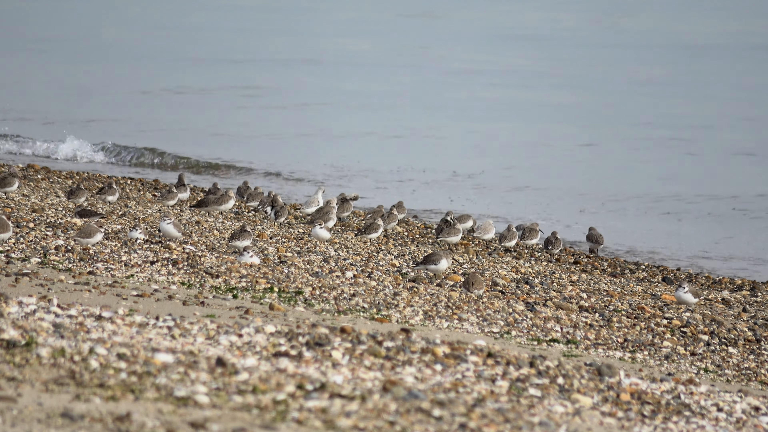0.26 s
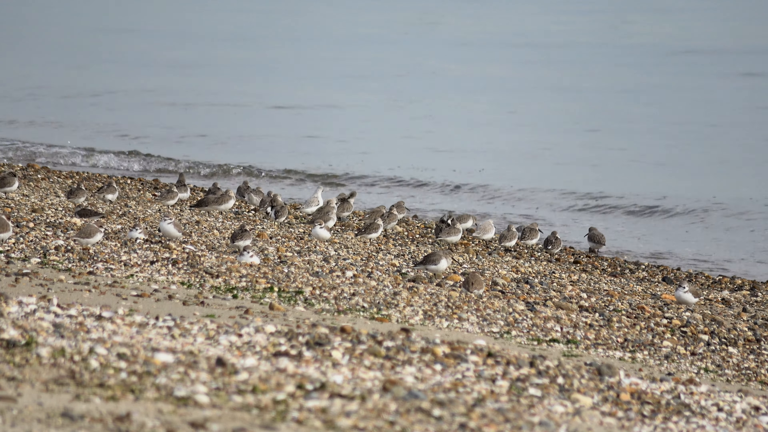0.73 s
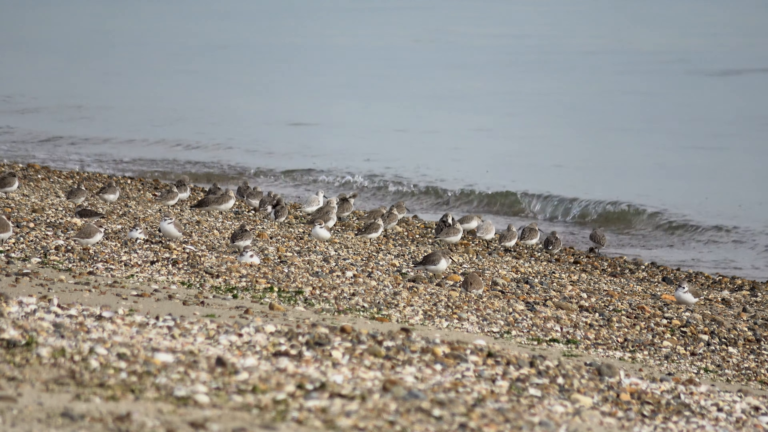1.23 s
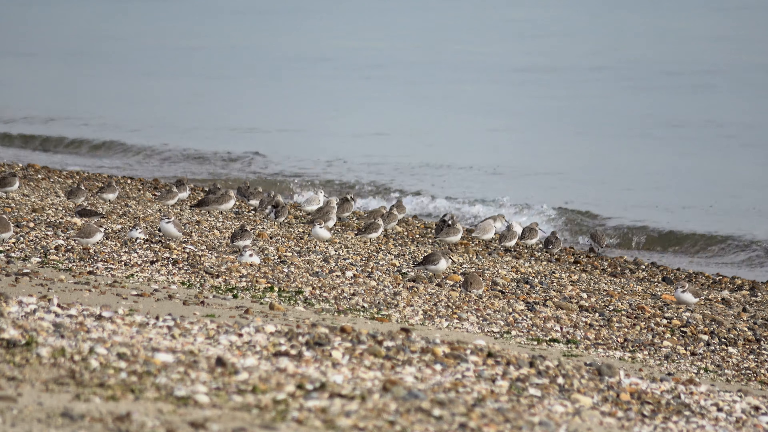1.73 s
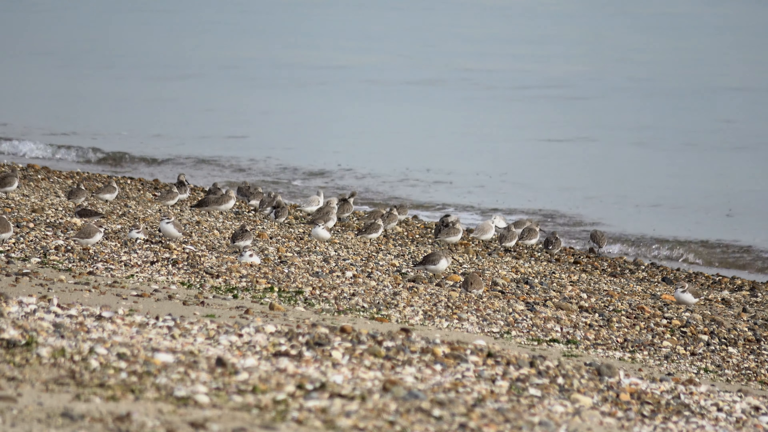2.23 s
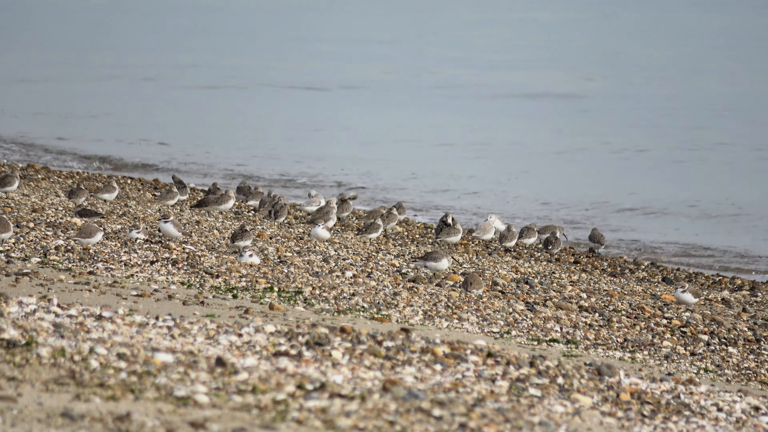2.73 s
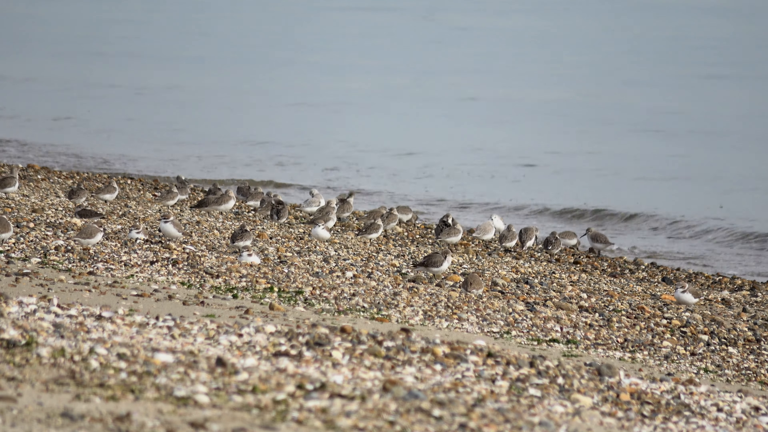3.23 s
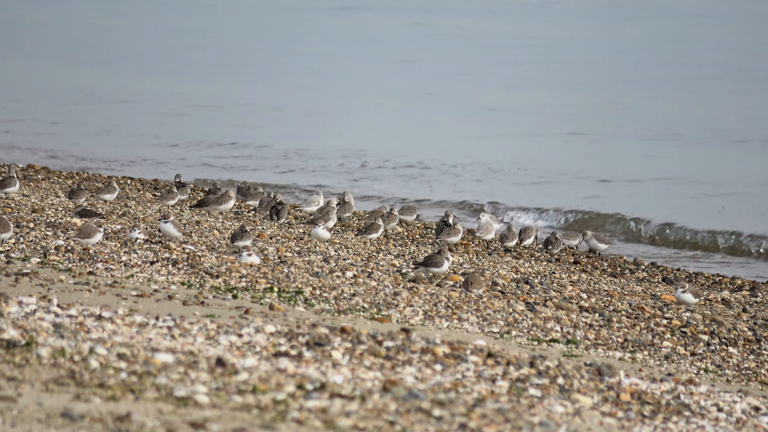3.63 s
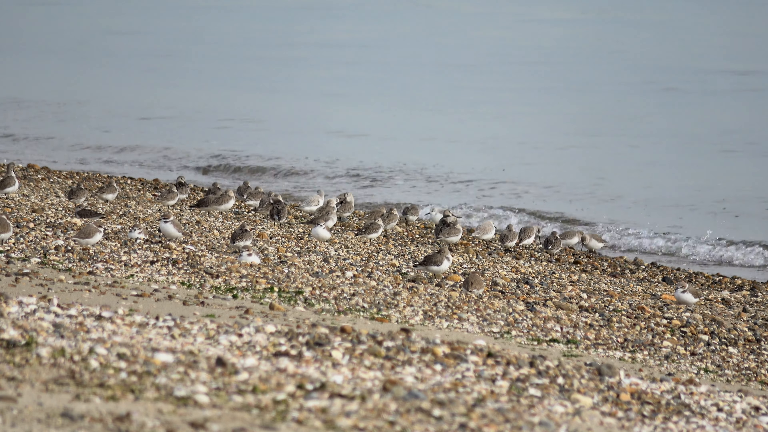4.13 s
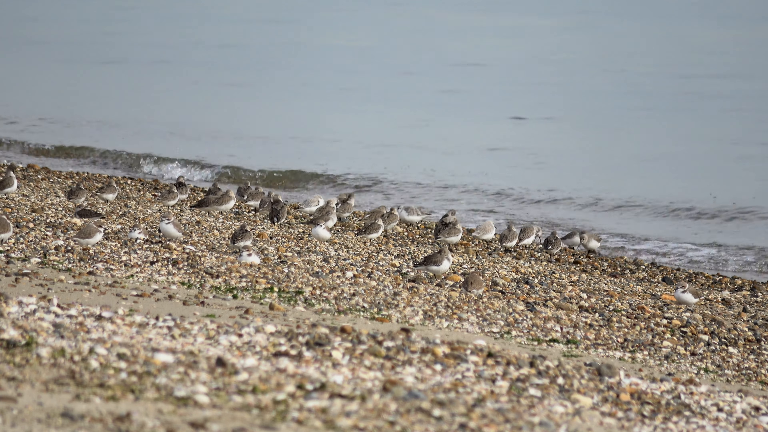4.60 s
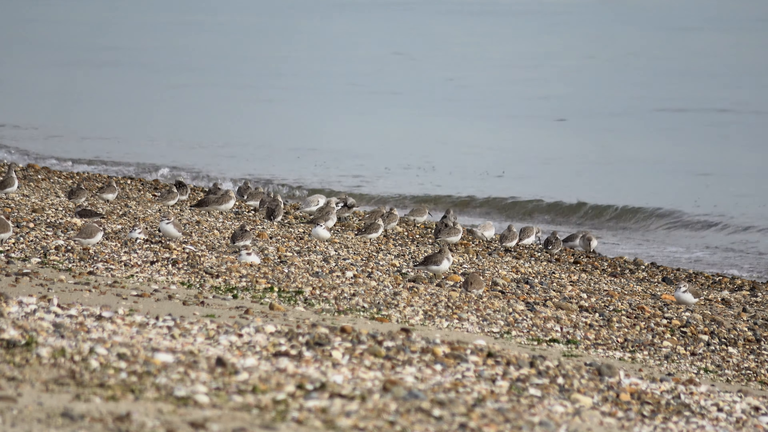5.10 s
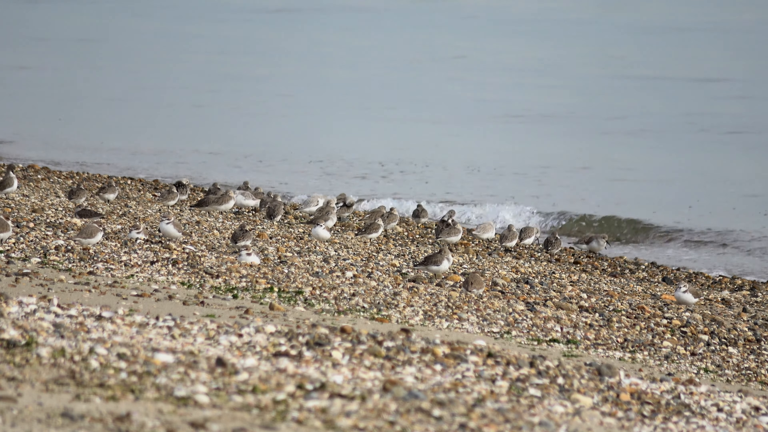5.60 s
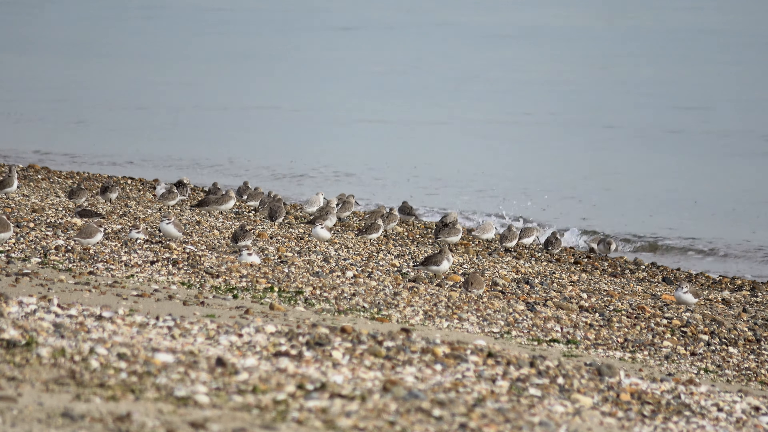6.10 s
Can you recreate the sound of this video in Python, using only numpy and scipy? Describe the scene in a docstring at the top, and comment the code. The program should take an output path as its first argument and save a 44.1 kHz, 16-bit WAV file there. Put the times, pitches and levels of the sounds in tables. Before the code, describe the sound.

An open shell and pebble beach, heard close in dry stereo, with low soft wind and a very faint wavering boat-like hum throughout. At the start a tiny spill is dying away, with a low gulp near 0.25 s. From about 0.7 s a wave builds with light spray, breaking fullest at 1.1-1.7 s: lumpy bubbling plunge, hollow glugs, bright wash and a crisp shell tick. A smaller spill follows around 1.9-2.2 s with more gulps and ticks, then water drains through fine rattling shingle. From 2.6 to 3.8 s it is nearly quiet, with trickles and faint laps. A second wave gathers from 3.9 s, spilling at 4.3-5.1 s with glugs, patter and a clear tick around 4.6 s; a last push at 5.2-5.5 s fades into soft draining by 6.3 s. The water sits right of centre, its spent wash drifting inward.

```python
"""Small waves on a shell beach

Two small waves curl and spill on shells and pebbles, right of centre, their spent water drifting to the middle.
Clouds of ringing bubbles over shaped noise make the plunge, wash, spray and draining shingle; single decaying
sines make the glugs of trapped air and the ticks of shells. Under them lie a trickle between the stones, a low
rumble of wind in filtered noise, and a faint wavering hum of three sines, as of a far boat."""
import sys
import numpy as np
from scipy import signal
from scipy.fft import rfft, irfft, next_fast_len
from scipy.io import wavfile
from scipy.ndimage import uniform_filter1d, map_coordinates

SR = 44100
rng = np.random.default_rng(int(sys.argv[2]) if len(sys.argv) > 2 else 0)


def wav_out(sig):
    """Save sig, one row per channel (or a flat mono array), as 16-bit PCM at SR to the path in sys.argv[1]."""
    wavfile.write(sys.argv[1], SR, np.round(np.clip(np.atleast_2d(sig).T, -1, 1) * 32767).astype(np.int16))


N = 280035

# The largest pockets of air under a curling crest.
# Each row: start in seconds, level before trim in dB, starting pitch in Hz, left minus right in dB.
AIR_POCKETS = [(0.245, -35, 194, -11), (1.141, -30, 395, -9), (1.438, -25, 416, -10),
               (1.536, -23.5, 217, -7), (1.921, -31.5, 238, -6), (2.019, -38, 287, -6),
               (3.525, -41, 385, -2), (4.379, -34, 165, 4), (4.55, -33.5, 263, 0), (4.598, -35, 237, -5),
               (4.868, -29.5, 363, -13), (4.88, -32.5, 197, -2), (5.022, -31, 445, -12),
               (5.41, -34, 250, -6)]


def amp(db):
    """Decibels to gain."""
    return 10 ** (np.asarray(db) / 20)


def unit(x):
    """Scale to rms 1."""
    return x / np.sqrt(np.mean(x ** 2) + 1e-20)


def curves(rows):
    """One value per sample for each column after the time in seconds."""
    seconds, *columns = np.transpose(rows)
    return [np.interp(np.arange(N) / SR, seconds, column) for column in columns]


def wobble(rate):
    """A smooth random curve, rate knots a second."""
    knots = rng.standard_normal(int(N * rate / SR) + 4)
    return map_coordinates(knots, [np.arange(N) * rate / SR])


def filtered(x, response):
    """x times a response of frequency."""
    size = next_fast_len(N + 8192)
    gain = response(np.fft.rfftfreq(size, 1 / SR))
    return irfft(rfft(x, size) * gain, size)[..., :N]


def coloured(x, spectrum):
    """x shaped by (Hz, dB) points on a log frequency axis, at rms 1."""
    f, db = np.transpose(spectrum)
    return unit(filtered(x, lambda hz: amp(np.interp(np.log(hz + 1), np.log(f), db))))


def placed(x, pan_db):
    """A sound shared between left and right by level alone; pan_db is left minus right."""
    left = 1 / (1 + amp(-pan_db))
    return 2 * np.array([left * x, (1 - left) * x])


def add(track, s, sound):
    """Mix a short sound in at time s, in seconds."""
    part = track[..., round(s * SR):][..., :sound.shape[-1]]
    part += sound[..., :part.shape[-1]]


def ping(age, rise):
    """The envelope of a ringing bubble or shell, peaking at 1; age and rise count lifetimes."""
    shape = (1 - np.exp(-age / rise)) * np.exp(-age)
    return shape / (shape.max(axis=-1, keepdims=True) + 1e-12)


def bubbles(low_hz, high_hz, cycles, spread_db, count, size):
    """A cloud of count bubbles, size samples long, each rising in pitch as it dies over some cycles."""
    when, pitch, strength = rng.random((count, 3)).T[:, :, None]
    hz = low_hz * (high_hz / low_hz) ** pitch
    turns = hz * np.arange(size) / SR
    age = turns / cycles
    # a few bubbles are much stronger than the rest; small ones are short, so need more height
    gain = amp(-spread_db * np.log(1 - .995 * strength)) * hz
    rings = gain * ping(age, rise=0.18) * np.sin(2 * np.pi * turns * (1 + 0.042 * age))
    at = (when * N).astype(int) + np.arange(size)
    return unit(np.bincount(at.ravel(), rings.ravel(), N)[:N])


def patchy(depth_db):
    """Noise of rms 1 that swells and thins in small patches of time and pitch."""
    z = signal.stft(rng.standard_normal(N), nperseg=512)[2]
    field = uniform_filter1d(rng.standard_normal(z.shape), size=4, axis=0)
    field = uniform_filter1d(field, size=6, axis=1)
    return unit(signal.istft(z * amp(depth_db * unit(field)), nperseg=512)[1][:N])


def water(cloud, spectrum, level_db, pan_db, blur_db, width_db, churn_db):
    """Near bubbles over the blur of countless far ones, churning, spread a little along the shore."""
    body = coloured(cloud + amp(blur_db) * patchy(depth_db=1.1), spectrum)
    # opposite signs left and right widen the water
    spread = amp(width_db) * coloured(rng.standard_normal(N), spectrum)
    churn = unit(amp(churn_db * wobble(28)))
    return amp(level_db) * churn * (placed(body, pan_db) + [spread, -spread])


def background():
    """Wind as low noise, partly independent left and right, and a far hum wavering in level and pitch."""
    # Each row: time in seconds, wind level before trim in dB.
    wind_levels = [(0, -50), (.3, -52.5), (.7, -51.5), (1.4, -50.5), (2.6, -53.5), (3.3, -51.5),
                   (4.4, -52.5), (5.15, -50.5), (6.35, -52)]
    # Spectrum of the wind. Each row: frequency in Hz, relative level in dB.
    rumble_spectrum = [(15, -27), (28, -16), (45, -3), (65, -2), (100, -2), (130, -6.5), (180, -6.5),
                       (220, -9.5), (290, -15), (450, -25.5), (1000, -33), (4000, -69)]
    # Partials of the hum. Each row: mean frequency in Hz, level before trim in dB.
    hum_partials = [(72, -63.5), (161.5, -54.5), (218, -63.5)]
    wind_db, = curves(wind_levels)
    wind = placed(coloured(rng.standard_normal(N), rumble_spectrum), 2.7)
    eddies = amp(-29) * np.array([coloured(rng.standard_normal(N), rumble_spectrum) for _ in range(2)])
    hum = np.zeros(N)
    for hz, db in hum_partials:
        level = amp(db + 0.1 + 0.72 * wobble(2.7))
        phase = 2 * np.pi * np.cumsum(hz + 0.82 * wobble(7)) / SR
        hum += level * np.sqrt(2) * np.sin(phase)
    return amp(wind_db + 2.5) * (wind + eddies) + placed(hum, 2.9)


def trickle():
    """Sparse, long-ringing bubbles between the stones, heard when the surf has sunk away."""
    # Spectrum of the gurgles. Each row: frequency in Hz, relative level in dB.
    trickle_spectrum = [(350, -25), (490, 2.5), (720, -16.5), (1100, 0), (1500, -5.5), (2300, -16.5),
                        (4000, -11.5), (8000, -35)]
    gurgle = bubbles(451, 3564, cycles=7.6, spread_db=2.5, count=1600, size=1500)
    return placed(amp(-65) * coloured(gurgle, trickle_spectrum), -7.0)


def backwash(level_db, pan_db):
    """Draining water rolls small shells and pebbles against each other: a cloud of short rings."""
    # Spectrum of the rolling stones. Each row: frequency in Hz, relative level in dB.
    shingle_spectrum = [(700, -28), (1400, -5), (2300, 0), (3200, -3), (4200, -7.5), (6000, -13),
                        (10000, -37), (15000, -48)]
    rattle = bubbles(1334, 8970, cycles=2.8, spread_db=2.5, count=12000, size=240)
    return water(rattle, shingle_spectrum, level_db + 0.33, 0.36 * pan_db,
                 blur_db=5.5, width_db=-16.5, churn_db=0.67)


def spray(level_db, pan_db):
    """Drops patter on the shells and foam bursts; between the waves only the sizzle is left."""
    # Spectrum of the patter. Each row: frequency in Hz, relative level in dB.
    spray_spectrum = [(1000, -29), (2500, -1.5), (4000, 0), (5300, -1.5), (7000, -4.5), (10000, -10),
                      (12500, -16.5), (15500, -35)]
    # Spectrum of the sizzle. Each row: frequency in Hz, relative level in dB.
    hiss_spectrum = [(200, 6), (1000, -12), (4000, -5), (8000, -1), (12000, -3.5), (15500, -8)]
    drops = bubbles(2530, 14500, cycles=2.56, spread_db=3.0, count=24000, size=90)
    patter = water(drops, spray_spectrum, level_db + 0.12, pan_db - 0.6,
                   blur_db=2.5, width_db=-23, churn_db=1.27)
    # high sizzle over the wet shells: its level at rest, and its share of the spray
    sizzle = np.hypot(amp(-67.5), amp(level_db - 15))
    return patter + sizzle * coloured(rng.standard_normal(N), hiss_spectrum)


def ticks(pan_db, cycles=1.53, level_db=7.0):
    """Shells and drops strike the shingle: sines that die in a few cycles, placed at the water's edge."""
    # The clearest strikes. Each row: start in seconds, level before trim in dB, pitch in Hz.
    strikes = [(0.154, -54, 5800), (0.61, -57, 10500), (0.702, -52.5, 7300), (0.8545, -45, 6000),
               (1.457, -37, 3560), (1.936, -37.5, 5000), (1.9838, -39, 5000), (2.211, -41.5, 4750),
               (2.2125, -42.5, 6300), (3.351, -55, 4660), (4.1575, -48, 8000), (4.564, -38.5, 5500)]
    out, t = np.zeros(N), np.arange(SR // 100) / SR
    for s, db, hz in strikes:
        envelope = ping(hz * t / cycles, rise=0.72)
        add(out, s, amp(db + level_db) * envelope * np.sin(2 * np.pi * hz * t))
    return placed(out, pan_db)


def glugs(cycles=1.58, glide=0.012, level_db=-4.0):
    """Each collapsing pocket of air gives a short low gulp, a sine gliding slightly up as it dies."""
    out, t = np.zeros((2, N)), np.arange(SR // 10) / SR
    for s, db, hz, pan_db in AIR_POCKETS:
        age = hz * t / cycles
        tone = np.sin(2 * np.pi * hz * t * (1 + glide * age))
        add(out, s, placed(amp(db + level_db) * ping(age, rise=0.37) * tone, pan_db))
    return out


def surf(plunge_db, plunge_pan_db, wash_db, wash_pan_db):
    """Big bubbles in the lumpy plunge, smaller ones in the wash, and the thump of falling water."""
    # Spectra of the plunge, the wash and the falling mass of water.
    # Each row: frequency in Hz, relative level in dB.
    plunge_spectrum = [(40, -40), (100, -20), (200, -2), (300, 1.5), (420, 1), (560, -1.5), (750, -5.5),
                       (1100, -10), (2500, -30), (6000, -80)]
    wash_spectrum = [(150, -29), (450, -9.5), (800, -2), (1050, -2), (1300, -1), (2000, -5.5), (2600, -9.5),
                     (3200, -11.5), (4500, -16.5), (7000, -20.5), (15000, -57)]
    thump_spectrum = [(60, -35), (95, -6), (125, 0.5), (175, -6.5), (230, 0), (320, -10), (600, -53)]
    big = bubbles(149.3, 1192, cycles=2.03, spread_db=1.2, count=3000, size=1200)
    small = bubbles(603, 3990, cycles=4.07, spread_db=2.5, count=11000, size=440)
    plunge = water(big, plunge_spectrum, plunge_db + 0.13, plunge_pan_db - .8,
                   blur_db=9.5, width_db=-31, churn_db=0.7)
    wash = water(small, wash_spectrum, wash_db + 0.54, wash_pan_db + 0.1,
                 blur_db=8.5, width_db=-22, churn_db=0.28)
    # only the hardest plunges shake a large mass of water
    thump_gain = amp(-40.5 + 1.7 * (plunge_db + 38.0))
    thump = thump_gain * coloured(rng.standard_normal(N), thump_spectrum)
    return placed(thump, plunge_pan_db + 10.0) + plunge + wash


def swell(age, rise_s, hold_s, fall_db_per_s):
    """The gain of one breaker: it builds, holds and dies away."""
    fall_db = fall_db_per_s * np.maximum(age - rise_s - hold_s, 0)
    return np.clip(age / rise_s, 0, 1) * amp(-fall_db)


def together(t, gains, pans_db):
    """Level and place, both in dB and per sample, of overlapping swells known at times t."""
    power = np.square(gains) + 1e-14
    total = power.sum(axis=0)
    pan_db = (power * pans_db).sum(axis=0) / total
    return curves(np.column_stack([t, 10 * np.log10(total), pan_db]))


def shore():
    """Every breaker plunges, washes, sprays and drains; gives (level, place) for each of the four."""
    # Stretches of crest that spill, one after another along the shore.
    # Each row: start in seconds, rise in seconds, hold in seconds, wash level before trim in dB,
    # wash fall in dB per second, plunge over wash in dB, spray over wash in dB, left minus right in dB.
    crests = [(-0.2, 0.13, 0.25, -56.5, 12, 1.5, -15.5, -18), (0.672, 0.3, .17, -50.5, 11, -1, -4, -10),
              (1.093, 0.35, .19, -41.6, 28, -.5, -6.5, -8.5), (1.75, 0.32, 0.2, -49, 24, -2.5, -9.3, -2.5),
              (3.3, 0.29, 0.41, -66.5, 15.5, -2, -20, -4.5), (3.47, .06, 0.018, -61, 81, -5, -18, -3),
              (3.917, 0.25, 0.097, -52.5, 14, -1.5, -7.5, -5), (4.165, .02, .02, -65, 110, -6, 1, -8),
              (4.257, 0.27, .52, -46.5, 17.5, -.5, -5.5, -10), (5.19, .16, 0.17, -46, 24, -4, -10, -5.5),
              (5.959, 0.054, 0.048, -60.5, 24, -5, -22.5, -28)]
    control_hz = 400
    plunge_fall, spray_fall = 0.81, 1.09  # how fast they die, relative to the wash
    spray_lead_s = 0.04  # drops fly ahead of the crest
    pan_db_per_s = 0.5  # the spent water spreads towards the middle
    full_wash_db, full_length_s = -44.5, 0.4  # a full-sized breaker: its wash, and its rise plus hold
    full_drain_db, drain_grows, drain_fall_db_per_s = -54, .55, 7.5  # growth in dB per dB of wash
    drain_s, dry_s = 1.9, .6  # the shingle drains this long after a crest, then runs dry
    surge_db, surge_rise_s, surge_hold_s, surge_fall_db_per_s = -16, 0.022, 0.021, 116

    t, gains, pans = np.arange(0, N / SR, 1 / control_hz), [], []
    for s, rise, hold, db, fall, plunge_db, spray_db, pan_db in crests:
        age = t - s
        wet = np.clip(1 - (age - rise - drain_s) / dry_s, 0, 1)
        drain_db = full_drain_db + drain_grows * (db - full_wash_db)
        # a short slap carries too little water to drain for long
        volume = np.clip((rise + hold) / full_length_s, 0, 1)
        gains.append([amp(db + plunge_db) * swell(age, rise, hold, fall * plunge_fall),
                      amp(db) * swell(age, rise, hold, fall),
                      amp(db + spray_db) * swell(age + spray_lead_s, rise, hold, fall * spray_fall),
                      amp(drain_db) * volume * wet * swell(age, rise, hold, drain_fall_db_per_s)])
        pans.append(np.minimum(pan_db + pan_db_per_s * np.maximum(age - rise, 0), 0))
    plunge, wash, foam, drain = map(list, zip(*gains))

    # the water churns round each glug, a brief surge in the plunge
    surges, surge_pans = [], []
    for s, db, _, pan_db in AIR_POCKETS:
        age = t - s + surge_rise_s / 2
        surges.append(amp(db + surge_db) * swell(age, surge_rise_s, surge_hold_s, surge_fall_db_per_s))
        surge_pans.append(np.full(len(t), pan_db))
    plunging = together(t, plunge + surges, pans + surge_pans)
    return [plunging] + [together(t, layer, pans) for layer in (wash, foam, drain)]


def scene():
    """The open shore, with no echo."""
    plunge, wash, foam, drain = shore()
    foam_pan_db = foam[1]
    bed = background() + trickle()
    edge = backwash(*drain) + spray(*foam) + ticks(foam_pan_db)
    return bed + edge + glugs() + surf(*plunge, *wash)


def record(dry):
    """A steep low-pass: nothing is kept from 15.7 kHz up."""
    return filtered(dry, lambda hz: hz < 15700)


dry = scene()
out = record(dry)
wav_out(out)
```